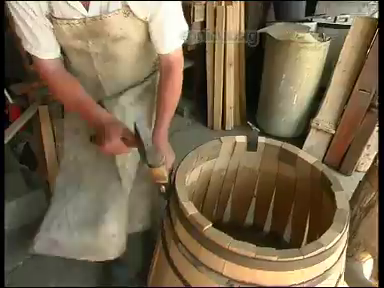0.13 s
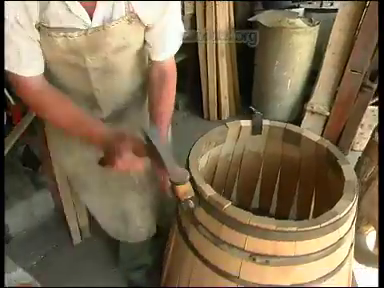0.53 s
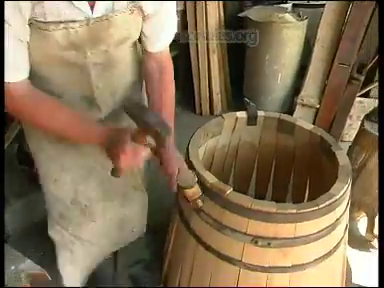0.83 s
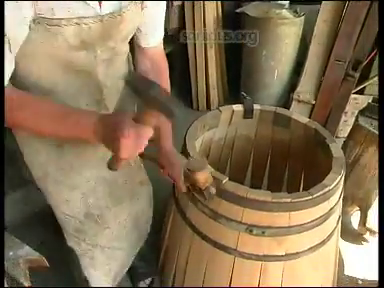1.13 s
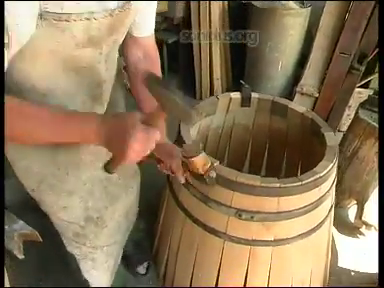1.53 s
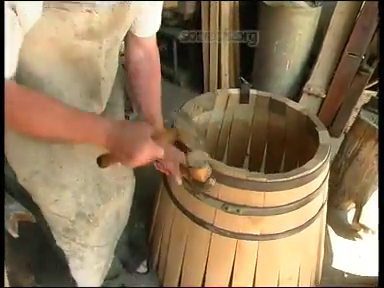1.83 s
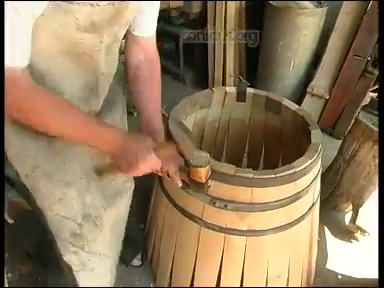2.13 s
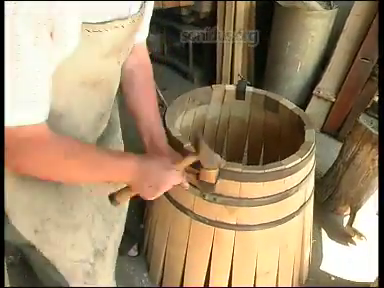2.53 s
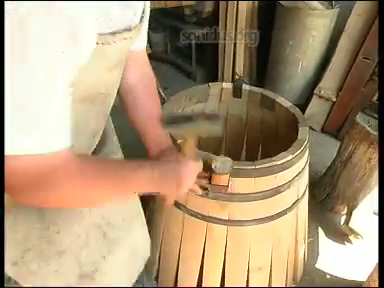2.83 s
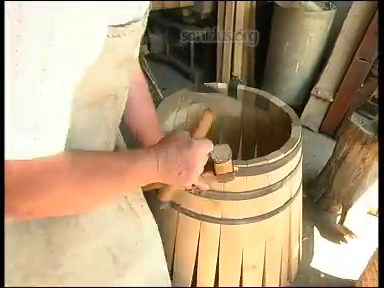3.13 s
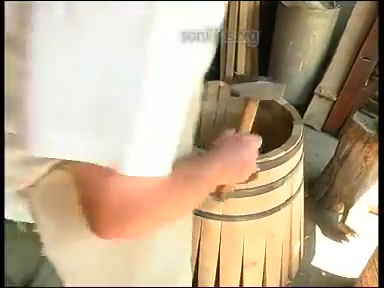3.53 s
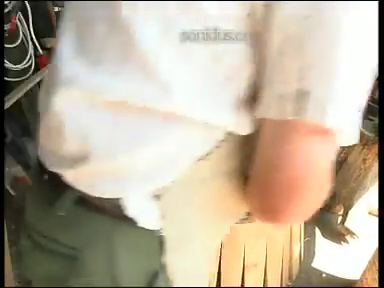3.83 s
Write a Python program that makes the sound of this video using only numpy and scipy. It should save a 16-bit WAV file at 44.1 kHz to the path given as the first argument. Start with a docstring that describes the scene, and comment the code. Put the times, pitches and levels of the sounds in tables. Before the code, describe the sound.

Hammer blows drive an iron hoop down a wooden barrel in quick uneven pairs, close up

```python
"""A hammer drives an iron hoop down a wooden barrel, close to the microphone, in uneven pairs of blows.
Each blow is decaying modes and dense clatter of hoop and staves, with a brief crack of noise almost at once
and a short ring of the workshop. Between blows the driver is set down with knocks, thuds and ticks, and
scraped along the hoop in random slips. A faint steady background lies behind; the microphone overloads on peaks."""
import sys
import numpy as np
from scipy import signal
from scipy.io import wavfile

SR = 44100
rng = np.random.default_rng(int(sys.argv[2]) if len(sys.argv) > 2 else 0)


def wrap_up_sound(samples):
    """Save the sound to the file named by the first command line argument, as 16-bit audio."""
    columns = np.atleast_2d(samples).T
    # keep every value between -1 and 1, then stretch to whole-number steps
    tamed = np.clip(columns, -1, 1)
    steps = np.round(tamed * 32767).astype(np.int16)
    wavfile.write(sys.argv[1], SR, steps)


N = 176400  # samples, 4 s
T = np.arange(SR * 3 // 4) / SR  # time axis of one contact, s

# Hammer blows. Each row: start in seconds, wood in dB, hollow low modes in dB, clang in dB, sizzle in dB,
# crack in dB, room after-ring in dB, strongest ring at that spot in Hz.
HAMMER_BLOWS = [(0.124, 0.5, -0.5, 6, -3.5, -15, -0.5, 1346), (0.212, 2, 4, -8, -9, 12, 3, 1110),
                (0.6346, 4.5, 1.5, -2.5, -8.5, -6, -1.5, 1590), (0.926, -0.5, -6, 2, -0.5, 3.5, -2, 1360),
                (1.015, 2.5, -1.5, 4, -3, -0.5, -2, 1584), (1.261, -1, -1, 5.5, -3, 1, -1.5, 2534),
                (1.406, -1, 3, 2.5, -12, -10, -2, 1303), (1.4275, 4, -1.5, -10.5, -4, 11.5, -2.5, 1000),
                (1.6833, -4, 4, 2.5, -2.5, -5, 0, 1963), (1.819, 4, 2.5, 1, 0.5, 12, -0.5, 975),
                (2.0887, -1.5, -1, 5.5, 3.5, -9, -4.5, 2046), (2.2193, -0.5, 0.5, 5, 7.5, 5.5, -0.5, 1244),
                (2.506, -5.5, -3, 6, -9.5, -12, -6, 1950), (2.6016, -2, 1, 7.5, 3, 3.5, -1, 2830),
                (2.8882, 0, 3, -6, -7.5, -0.5, -3, 737), (2.9956, 2.5, 7, -8, -9, 6, -1, 820),
                (3.2925, -3.5, -11, 4, 0, -25, -4, 1877), (3.3862, 4, -2.5, 1.5, -2.5, 5, -3, 1415),
                (3.668, -5, -12, 2, 0, -25, -0.5, 2020), (3.783, -2, 0, 3, 5.5, -21, 2, 2004)]
# Centres in Hz of the wood, clang and sizzle bands.
BLOW_BANDS_HZ = [1090, 3050, 11000]
# Light knocks of driver and barrel. Each row: start in seconds, level in dB, brightness in dB per octave.
LIGHT_KNOCKS = [(.081, -19, -5), (0.473, -15.5, -2.5), (.482, -10.5, -11.5), (.511, -18.5, -2.5),
                (1.006, -13.5, -5.5), (1.193, -18.5, -1), (1.223, -20, -0.5), (1.674, -10, -7.5),
                (1.962, -18.5, -3.5), (2.347, -19.5, -1.5), (2.5, -8.5, -5), (2.748, -20.5, -2.5),
                (2.81, -22.5, -5.5), (2.847, -26, -1), (3.15, -23, -3), (3.938, -25.5, -3.5)]
# Soft thuds against the staves. Each row: start in seconds, level in dB.
STAVE_THUDS = [(0.853, -7.5), (1.2, -13), (1.386, -19), (3.251, -14.5)]
# Tiny ticks of steel on the hoop. Each row: start in seconds, level in dB.
HOOP_TICKS = [(0.3765, -26), (0.751, -25.5), (1.1243, -24), (1.5244, -34)]
# Driver scraping on the hoop. Each row: start in seconds, length in seconds, level at start in dB, at end in dB.
DRIVER_SCRAPES = [(0.087, 0.04, -26, -22.5), (0.501, 0.11, -31, -40), (1.202, 0.041, -23.5, -29),
                  (1.518, 0.084, -36.5, -46.5), (1.61, 0.067, -37, -28), (1.989, 0.096, -54, -26.5),
                  (2.419, 0.1, -44.5, -26), (2.56, 0.051, -42, -44), (2.827, 0.088, -37.5, -31.5),
                  (3.14, 0.12, -53, -34.5), (3.563, 0.047, -42.5, -44)]
# Modes of barrel and hoop. Each row: frequency in Hz, level in dB, time to fall 60 dB in seconds.
BARREL_MODES = [(155, -20, 0.29), (346.2, -11, 0.25), (397.1, -8.5, 0.2), (513.8, -9.5, 0.16),
                (835, -18.5, 0.25), (970, -8.5, 0.056), (1303, -10.5, 0.1), (1413, -5, 0.088),
                (1950, -7, 0.056), (2730, -15, 0.16), (3882, -12, 0.052), (7730, -25, 0.091)]
# Dense clatter of hoop and staves. Each row: frequency in Hz, relative level in dB per Hz, 60 dB decay in seconds.
HOOP_CLATTER = [(29.8, -8.5, 0.031), (91, -18.5, .08), (155, -0.5, 0.076), (275, -2.5, 0.11),
                (383, 1.5, 0.076), (684, -4.5, 0.068), (923, 6, 0.024), (1430, 5, 0.016),
                (2080, -1.5, 0.046), (3600, -7.5, 0.041), (7100, -10.5, 0.043), (10280, -17, 0.038),
                (15100, -41, 0.0084)]
# Workshop reverberation. Each row: frequency in Hz, relative level in dB per Hz, 60 dB decay in seconds.
WORKSHOP_REVERB = [(30, -32, 0.48), (83.6, -13.5, .4), (147.5, 3, .7), (240, -5.5, 0.6), (406, 4, 0.51),
                   (575, -1, 0.38), (1090, 2.5, 0.31), (1950, 3, 0.24), (4270, -2.5, 0.22),
                   (7600, -9, 0.21), (11700, -20.5, 0.17), (16000, -38, 0.13)]
# Spectra of crack, thud, tick, scrape and background. Each row: frequency in Hz, relative level in dB per Hz.
CRACK_SPECTRUM = [(100, 3.5), (800, 5), (2500, 4), (5000, -5), (9000, 0), (12000, -14.5), (16000, -20)]
THUD_SPECTRUM = [(220, 7.5), (850, -4), (2200, -29.5)]
TICK_SPECTRUM = [(1000, -7), (5000, -0.5)]
SCRAPE_SPECTRUM = [(40, -40), (140, 4), (420, 9), (700, 5), (1400, 9), (2000, -2), (3000, -2), (7000, -7.5),
                   (12000, -20), (16000, -40)]
BACKGROUND_SPECTRUM = [(30, -29), (150, -5.5), (400, -15.5), (2000, -19), (5000, -26.5), (16000, -45.5)]

# Balance of the parts, dB
CLATTER_DB, MODES_DB, SPOT_DB, CRACK_DB, ROOM_DB = 12.5, 6.5, 4, 2, 7
BACKGROUND_DB = -51.5  # RMS level
# Time constants of onset, s
CLATTER_RISE_S, MODE_RISE_S, ROOM_RISE_S = 0.00032, 0.00013, 0.0041
CRACK_DECAY_S, CRACK_DELAY_S, SPOT_T60_S = 0.00086, 0.0004, 0.077
# Variation from one contact to the next
MODE_SPREAD_DB, SPOT_SPREAD_DB, HOLLOW_BELOW_HZ = 2, 5.0, 600
# Scrape: slips and grip, then the ringing they set off
GRIT_PER_S, GRIT_DB, GRIP_HZ, GRIP_DB, SWELL_S = 900, 4.5, 51, 5, 0.019
SCRAPE_ECHO_S, SCRAPE_ECHO_GAIN, RUB_BODY_DB = 0.024, 0.74, -12.5
SQUEAK_HZ, SQUEAK_DB, SQUEAK_T60_S = 2070, -10.5, 0.045
# Microphone
START_S, OPENING_S, CEILING, EDGE_HZ = 0.082, 0.0026, 0.92, 16000


def amp(db):
    """Decibels to gain."""
    return 10 ** (np.asarray(db) / 20)


def unit(x):
    """Scales to energy 1."""
    return x / np.sqrt(np.sum(x ** 2) + 1e-20)


def read(table, hz, axis=1):
    """One column of a table, joined on a log-frequency axis."""
    table = np.array(table)
    return np.interp(np.log(hz + 1), np.log(table[:, 0]), table[:, axis])


def add(mix, s, sound):
    """Mixes a sound in at a time."""
    part = mix[max(round(s * SR), 0):][:len(sound)]
    part += sound[:len(part)]


def colour(x, table):
    """Causal minimum-phase filter with the given spectrum."""
    hz = abs(np.fft.fftfreq(4096, 1 / SR))
    log_gain = np.log(amp(read(table, hz)))
    # The Hilbert transform of the log gain gives the minimum phase.
    response = np.exp(np.conj(signal.hilbert(log_gain)))
    taps = np.fft.ifft(response).real[:2048]
    return signal.fftconvolve(x, taps)[:len(x)]


def dying(table, rise_s):
    """Countless overlapping resonances as noise, each band dying at its own speed."""
    hz, t, bands = signal.stft(rng.standard_normal(len(T)), SR, nperseg=128)
    t60 = read(table, hz, axis=2)[:, None]
    noise = signal.istft(bands * amp(-60 * t / t60), SR)[1][:len(T)]
    rise = 1 - np.exp(-T / rise_s)
    return unit(colour(noise * rise, table))


def ring(hz, t60):
    """One decaying mode of energy 1, at a random phase."""
    tone = np.sin(2 * np.pi * (hz * T + rng.random()))
    rise = 1 - np.exp(-T / MODE_RISE_S)
    return unit(tone * amp(-60 * T / t60) * rise)


def barrel(after_db=0, hollow_db=0):
    """Struck barrel and room: hollow low modes, higher modes and clatter that vary at each contact."""
    modes = np.zeros(len(T))
    for hz, db, t60 in BARREL_MODES:
        variation_db = MODE_SPREAD_DB * rng.standard_normal()
        change_db = hollow_db if hz < HOLLOW_BELOW_HZ else variation_db
        modes += amp(db + change_db) * ring(hz, t60)
    clatter = amp(CLATTER_DB) * dying(HOOP_CLATTER, CLATTER_RISE_S)
    reverb = amp(ROOM_DB + after_db) * dying(WORKSHOP_REVERB, ROOM_RISE_S)
    bands_hz = np.geomspace(520, 16000, 140)
    spot_db = SPOT_SPREAD_DB * rng.uniform(-1, 1, len(bands_hz))
    spot_db[0] = 0  # flat from the lowest band down
    return colour(clatter + reverb, np.c_[bands_hz, spot_db]) + amp(MODES_DB) * modes


def workshop():
    """Faint steady background of the place: noise of constant level with a falling treble."""
    noise = colour(rng.standard_normal(N), BACKGROUND_SPECTRUM)
    return amp(BACKGROUND_DB) * np.sqrt(N) * unit(noise)


def knocks():
    """Light contacts that set the same barrel ringing, the spectrum tilted towards the bass."""
    out = np.zeros(N)
    hz = np.array([750, 1000, 8000])
    octaves = np.log2(hz / hz[1])
    for s, db, tilt in LIGHT_KNOCKS:
        sound = colour(barrel(after_db=2.5), list(zip(hz, tilt * octaves)))
        add(out, s, amp(db) * sound)
    return out


def scrapes():
    """The driver slides in uneven slips that swell, setting hoop and staves ringing."""
    slip_size = amp(GRIT_DB * np.minimum(rng.exponential(1, N), 2))
    slip_happens = rng.random(N) < GRIT_PER_S / SR
    slips = slip_size * rng.choice([-1, 1], N) * slip_happens
    # Slow noise of RMS 1 makes the grip waver.
    lowpass = signal.butter(2, GRIP_HZ, fs=SR, output="sos")
    grip = np.sqrt(N) * unit(signal.sosfilt(lowpass, rng.standard_normal(N)))
    grit = np.sqrt(N) * unit(colour(slips * amp(GRIP_DB * grip), SCRAPE_SPECTRUM))

    pressure = np.zeros(N)
    for s, length, first_db, last_db in DRIVER_SCRAPES:
        t = np.arange(0, length, 1 / SR)
        level_db = first_db + (last_db - first_db) * t / length
        add(pressure, s, amp(level_db) * np.minimum(t / SWELL_S, 1))
    rub = grit * pressure

    echo = unit(rng.standard_normal(len(T)) * np.exp(-T / SCRAPE_ECHO_S))
    body = unit(sum(amp(db) * ring(hz, t60) for hz, db, t60 in BARREL_MODES))
    squeak = ring(SQUEAK_HZ, SQUEAK_T60_S)
    response = SCRAPE_ECHO_GAIN * echo + amp(RUB_BODY_DB) * body + amp(SQUEAK_DB) * squeak
    return rub / 2 + signal.fftconvolve(rub, response)[:N]


def hammer():
    """The barrel rings at each blow; a brief noise crack of steel on the driver joins 0.4 ms later."""
    out = np.zeros(N)
    for s, wood, hollow_db, clang, sizzle, crack_db, after_db, spot_hz in HAMMER_BLOWS:
        sound = barrel(after_db, hollow_db) + amp(SPOT_DB) * ring(spot_hz, SPOT_T60_S)
        balance = list(zip(BLOW_BANDS_HZ, (wood, clang, sizzle)))
        add(out, s, colour(sound, balance))
        burst = rng.standard_normal(len(T)) * np.exp(-T / CRACK_DECAY_S)
        crack = unit(colour(burst, CRACK_SPECTRUM))
        add(out, s + CRACK_DELAY_S, amp(CRACK_DB + crack_db) * crack)
    return out


def touches(events, spectrum):
    """Small contacts stir part of the barrel's range: soft wood the bass, steel on steel the treble."""
    out = np.zeros(N)
    for s, db in events:
        add(out, s, amp(db) * colour(barrel(), spectrum))
    return out


def scene():
    """All sources at one close microphone."""
    ticks = touches(HOOP_TICKS, TICK_SPECTRUM)
    thuds = touches(STAVE_THUDS, THUD_SPECTRUM)
    return (workshop() + knocks() + scrapes() + hammer() + ticks + thuds)[None]


def record(dry):
    """The sound opens after a moment of silence; peaks saturate; then the band limit."""
    opening = np.clip((np.arange(N) / SR - START_S) / OPENING_S, 0, 1)
    overloaded = CEILING * np.tanh(dry * opening / CEILING)
    lowpass = signal.firwin(301, EDGE_HZ, window=("kaiser", 9), fs=SR)
    return signal.oaconvolve(overloaded, lowpass[None], "same")


dry = scene()
out = record(dry)
wrap_up_sound(out)
```